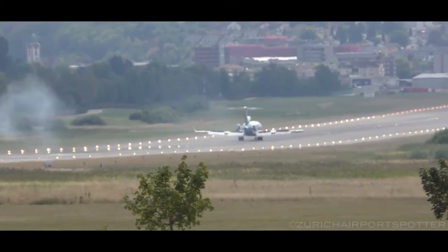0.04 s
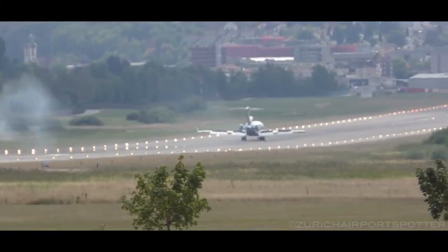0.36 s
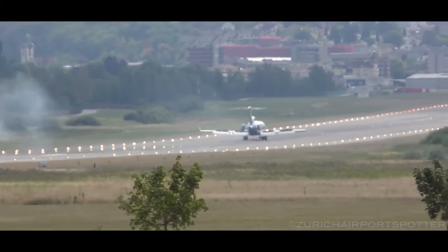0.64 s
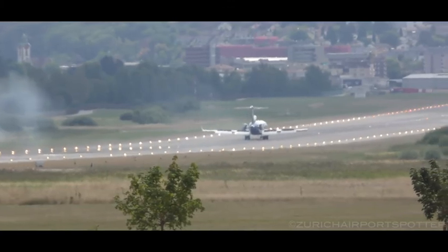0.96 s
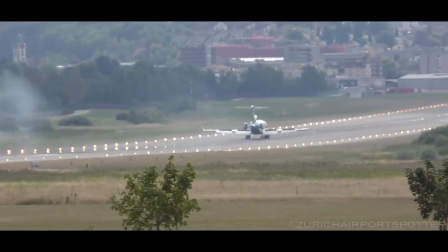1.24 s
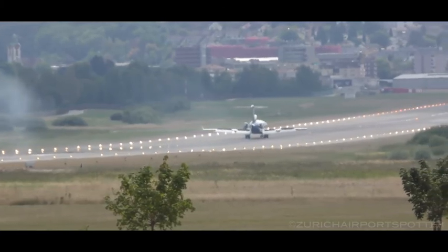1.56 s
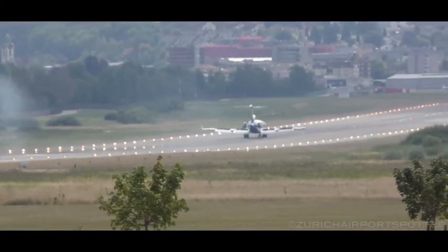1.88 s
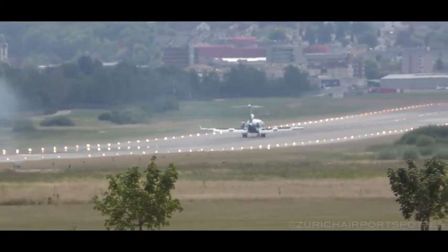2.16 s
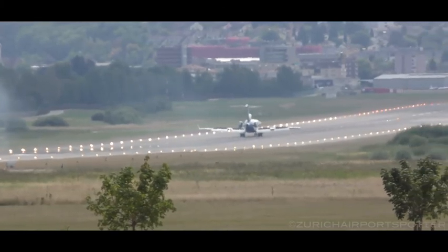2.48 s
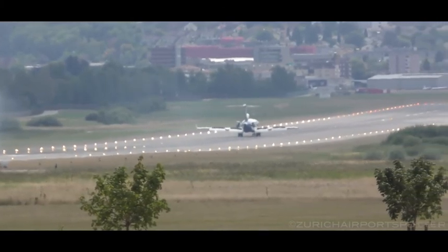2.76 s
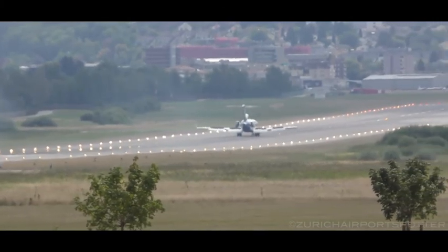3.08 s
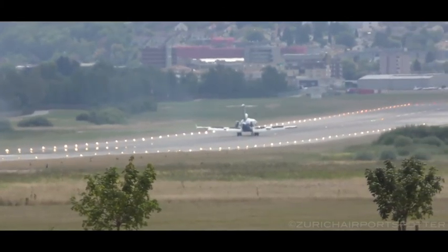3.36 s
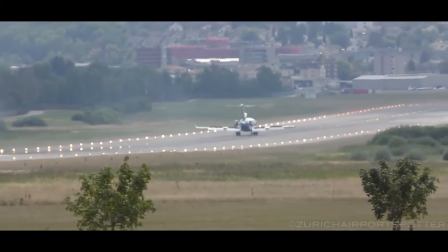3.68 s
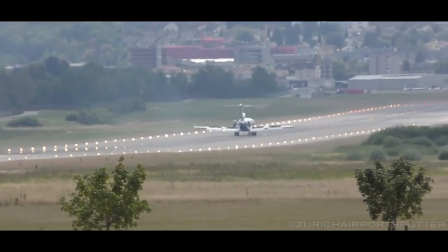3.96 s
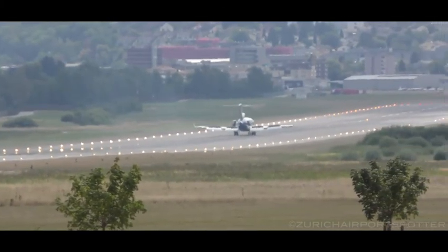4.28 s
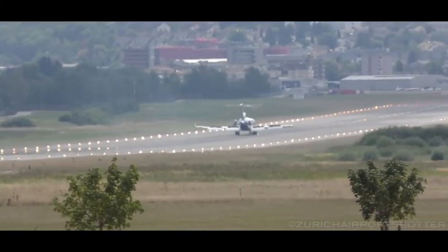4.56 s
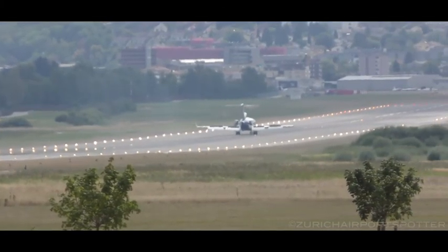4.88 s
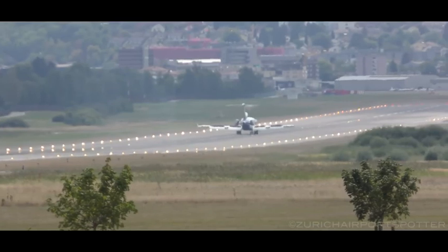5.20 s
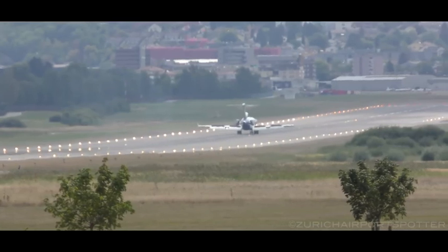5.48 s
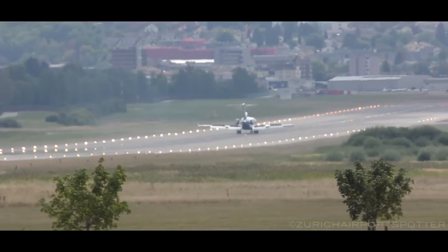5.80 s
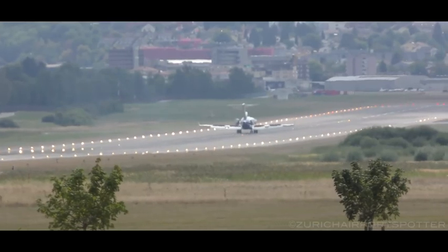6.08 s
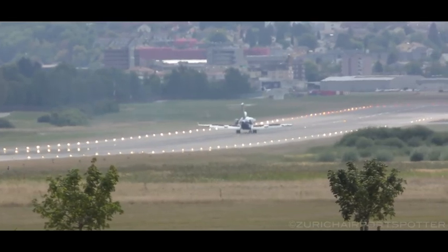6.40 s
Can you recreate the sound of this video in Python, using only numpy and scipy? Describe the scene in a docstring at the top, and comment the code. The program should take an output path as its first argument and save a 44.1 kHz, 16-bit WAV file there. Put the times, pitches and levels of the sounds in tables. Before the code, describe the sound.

Wind buffets the microphone in low, thumping gusts over the steady roar and rush of a distant jet on a runway.

```python
"""Gusts of wind buffet the microphone, and eddies shed by its housing hum with the wind's speed.
Beyond them a jet rolls along a far runway: the roar of its turbulent exhaust and a faint turbine
whistle swell across a meadow and waver in the moving air. Grasshoppers tick and rustle by
stridulation in the hissing grass, three faint clicks sound nearby, and a far bird peeps twice."""
import sys
import numpy as np
from scipy import signal
from scipy.fft import rfft, irfft, next_fast_len
from scipy.io import wavfile
from scipy.ndimage import uniform_filter1d, map_coordinates

SR = 44100
rng = np.random.default_rng(int(sys.argv[2]) if len(sys.argv) > 2 else 0)


def output_pcm(signal):
    """Save a mono or channel-first signal as 16-bit PCM at the path in sys.argv[1].

    Samples are clipped to [-1, 1] before scaling.
    """
    pcm = np.clip(np.atleast_2d(signal).T, -1, 1) * 32767
    wavfile.write(sys.argv[1], SR, np.round(pcm).astype(np.int16))


N = 288414


def amp(db):
    """Amplitude grows tenfold every 20 dB."""
    return 10 ** (np.asarray(db) / 20)


def unit(x):
    """Normalisation to rms 1."""
    return x / np.sqrt(np.mean(x ** 2) + 1e-20)


def curves(rows):
    """Linear interpolation in time: one curve for each column after the first."""
    times, *columns = np.transpose(rows)
    return [np.interp(np.arange(N) / SR, times, column) for column in columns]


def wobble(rate):
    """Smooth random modulation: a spline through rate knots a second."""
    knots = rng.standard_normal(int(N * rate / SR) + 4)
    return map_coordinates(knots, [np.arange(N) * rate / SR])


def swell(s, sigma):
    """A Gaussian envelope centred on s seconds."""
    away = (np.arange(N) / SR - s) / sigma
    return np.exp(-np.minimum(away ** 2 / 2, 20))


def filtered(x, response):
    """Linear filtering: the spectrum is multiplied by a frequency response."""
    size = next_fast_len(N + SR // 2)
    return irfft(rfft(x, size) * response(np.fft.rfftfreq(size, 1 / SR)), size)[:N]


def coloured(x, spectrum):
    """Spectral shaping by (Hz, dB) points on a log frequency axis, at rms 1."""
    f, db = np.transpose(spectrum)
    return unit(filtered(x, lambda hz: amp(np.interp(np.log(hz + 1), np.log(f + 1), db))))


def noise(spectrum):
    """Stationary coloured noise of rms 1."""
    return coloured(rng.standard_normal(N), spectrum)


def far_noise(spectrum, patchy_db):
    """Scintillation: turbulent air makes patches of a noise's spectrum fade and swell."""
    cells = signal.stft(rng.standard_normal(N), nperseg=1024)[2]
    fading = uniform_filter1d(rng.standard_normal(cells.shape), size=7, axis=0)  # across frequency
    fading = uniform_filter1d(fading, size=11, axis=1)  # across time
    patchy = signal.istft(cells * amp(patchy_db * unit(fading)))[1][:N]
    return coloured(patchy, spectrum)


def steadied(x, span):
    """Division by the running rms evens out swells slower than span seconds."""
    power = uniform_filter1d(x ** 2, size=int(span * SR))
    return unit(x / np.sqrt(np.abs(power) + 1e-6))


def narrow_tone(hz, rough, flutter_rate):
    """Random amplitude and phase modulation of a tone, at rms 1; rough is the noisy share."""
    share = np.clip(rough, 0, 1)
    flutter = np.sqrt(share / 2) * (wobble(flutter_rate) + 1j * wobble(flutter_rate))
    carrier = np.exp(2j * np.pi * np.cumsum(hz * np.ones(N)) / SR)
    return unit(np.real((np.sqrt(1 - share) + flutter) * carrier))


# Hiss of the grass. Each row: time in seconds, level in dB.
GRASS_LEVEL = [(0, -56), (.6, -56.5), (1.05, -55.5), (1.8, -58.5), (3.1, -60), (4.2, -57), (4.7, -59.5),
               (5.0, -56.5), (5.45, -59.5), (6.3, -56.5), (6.54, -56.5)]
# Its spectrum. Each row: frequency in Hz, relative density in dB.
GRASS_SPECTRUM = [(500, 2.5), (2000, 8), (2900, 1.5), (3350, -1), (3750, 0.5), (4100, -4), (5000, -10),
                  (6800, -18), (9500, -26), (15500, -27)]
def meadow():
    """Flow noise: grass and leaves hiss unevenly in the breeze, over the microphone's self-noise."""
    hiss_db, = curves(GRASS_LEVEL)
    hiss = amp(hiss_db + 0.29 * wobble(9)) * far_noise(GRASS_SPECTRUM, patchy_db=2.0)
    return hiss + amp(-73.0) * rng.standard_normal(N)


# Faint clicks nearby. Each row: start in seconds, level before the low-pass in dB.
CLICK_EVENTS = [(1.271, -44.5), (3.844, -51.5), (4.47, -46.3)]
# Their spectrum before the low-pass. Each row: frequency in Hz, relative density in dB.
CLICK_SPECTRUM = [(700, -5), (1400, -4.5), (3400, 0), (5000, -14), (14000, -23)]
def clicks(decay_s, cutoff_hz):
    """Damped transients: noise bursts decay exponentially, dulled by a low-pass."""
    t = np.arange(N) / SR
    envelope = sum(amp(db) * (t >= s) * np.exp(-np.abs(t - s) / decay_s) for s, db in CLICK_EVENTS)
    return filtered(noise(CLICK_SPECTRUM) * envelope, lambda hz: 1 / (1 + (hz / cutoff_hz) ** 4))


# Parts of the peeps. Each row: centre in seconds, pitch in Hz, level in dB,
# Gaussian width in seconds, noisy share from 0 to 1, flutter rate in Hz.
BIRD_PEEPS = [(4.343, 2260, -66, 0.04, 0.8, 150), (4.352, 3350, -62, 0.043, 0.95, 230.7),
              (4.385, 3445, -63.5, 0.024, 0.7, 110), (4.466, 3300, -66.5, 0.025, 0.9, 240),
              (6.494, 3010, -57, 0.01, 0.02, 100)]
def bird():
    """Spectral broadening: short peeps arrive blurred by distance."""
    return sum(amp(db) * swell(s, sigma) * narrow_tone(hz, rough, flutter_rate)
               for s, hz, db, sigma, rough, flutter_rate in BIRD_PEEPS)


# Thin insect rasps. Each row: start in seconds, end in seconds, level in dB.
RASP_RUNS = [(1.272, 1.417, -73.5), (1.699, 1.848, -77.5), (2.152, 2.97, -72.5)]
# Their spectrum. Each row: frequency in Hz, relative density in dB.
RASP_SPECTRUM = [(6000, -26.5), (10000, -8.5), (12500, -0.5), (15500, -1)]
def insect_rasps(edge_s=.03, flutter_db=4.0):
    """Amplitude-modulated noise: insects rasp high up in short fluttering runs."""
    t = np.arange(N) / SR
    runs = sum(amp(db) * np.clip(np.minimum(t - start, end - t) / edge_s + .5, 0, 1)
               for start, end, db in RASP_RUNS)
    return runs * amp(flutter_db * wobble(40)) * noise(RASP_SPECTRUM)


# The grasshopper chorus. Each row: time in seconds, level in dB.
CHORUS_LEVEL = [(0, -72.5), (.3, -66.5), (.5, -72), (1.15, -74), (1.35, -70.5), (1.62, -78), (1.82, -67.5),
                (2.05, -71.5), (2.3, -66), (2.9, -66.5), (3.08, -62.5), (3.4, -70.5), (3.82, -66.5),
                (4.05, -79.5), (4.7, -77), (5.0, -75.5), (5.5, -75), (6.0, -72.5), (6.54, -72.5)]
# Its spectrum. Each row: frequency in Hz, relative density in dB.
CHORUS_SPECTRUM = [(2500, -35), (4800, -0.5), (6700, 6), (8300, 2), (10000, -4.5), (12500, -3.5),
                   (15500, -4)]
def grasshopper_chorus(stroke_hz=18, depth_db=1.0):
    """Incoherent sources merge into one rustle that swells and ebbs in soft, uneven pulses."""
    level_db, = curves(CHORUS_LEVEL)
    cycles = np.cumsum(stroke_hz * (1 + 0.11 * wobble(4.1))) / SR
    pulse_db = depth_db * np.sin(2 * np.pi * cycles) + 1.8 * wobble(50)
    return amp(level_db + pulse_db) * noise(CHORUS_SPECTRUM)


# One grasshopper's phrases. Each row: start in seconds, end in seconds, strokes per second,
# final level in dB, relative level of the catch in dB, timing scatter in seconds.
TICK_PHRASES = [(0.022, 0.448, 17.1, -67.5, 0.5, .0008), (0.832, 1.86, 17.6, -73, -6.5, .007),
                (2.186, 3.19, 17.2, -68.5, -4.5, .003), (3.227, 3.468, 17.8, -65.5, -1.5, .0008),
                (3.505, 3.93, 17.15, -63, -2, 0.00073)]
# Spectrum of a stroke. Each row: frequency in Hz, relative density in dB.
TICK_SPECTRUM = [(3000, -55), (5600, -18.5), (6600, -4.5), (7700, -3), (8700, -10.5), (10500, -19.5),
                 (15500, -28)]
def grasshopper(catch_s=0.0035, scrape_db=-1.5, scrape_s=0.039, crescendo_db_per_s=2):
    """Stridulation: each wing stroke is a brief catch and a fading scrape; each phrase swells."""
    t = np.arange(N) / SR
    strokes = np.zeros(N)
    for start, end, rate, db, catch_db, scatter in TICK_PHRASES:
        for s in np.arange(start, end, 1 / rate):
            near = slice(max(int((s - .02) * SR), 0), int((s + .07) * SR))
            age = t[near] - s - scatter * rng.standard_normal()
            catch = amp(catch_db) * np.exp(-(age / catch_s) ** 2)
            attack = np.clip(age / catch_s + .5, 0, 1)
            scrape = amp(scrape_db) * attack * np.exp(-np.abs(age) / scrape_s)
            stroke_db = db - crescendo_db_per_s * (end - s) + rng.normal(0, .9)
            strokes[near] += amp(stroke_db) * (catch + scrape)
    return strokes * noise(TICK_SPECTRUM)


# The whistle as the air carries it over. Each row: time in seconds, level in dB.
WHISTLE_LEVEL = [(0, -72), (.95, -67.5), (1.7, -72.5), (3.5, -73), (4.1, -69.5), (4.6, -70.5), (4.95, -67),
                 (5.3, -69), (5.8, -68.5), (6.35, -67), (6.54, -68.5)]
def turbine(centre_hz=3380, width_hz=400):
    """Scattering in the exhaust and the long air path smears the blade tone into a narrow hiss."""
    level_db, = curves(WHISTLE_LEVEL)
    white = rng.standard_normal(N)
    band = filtered(white, lambda hz: 1 / (1 + ((hz - centre_hz) / width_hz * 2) ** 4) ** .5)
    return amp(level_db + .6 * wobble(8)) * unit(band)


# Exhaust levels before their gains. Each row: time in seconds, roar in dB, rush in dB.
EXHAUST_LEVELS = [(0.1, -40, -49.5), (0.49, -48.5, -50), (0.88, -42.5, -42.5), (1.3, -41, -42.5),
                  (2.1, -39, -43), (2.62, -37.3, -43), (2.85, -36.5, -41.5), (2.94, -40.5, -43),
                  (3.2, -38.5, -43), (3.75, -38, -43.5), (4.05, -36, -43.7), (4.25, -36, -43.5),
                  (4.42, -40.5, -44), (4.68, -39, -42.5), (4.81, -35, -42), (4.95, -36, -42.5),
                  (5.16, -37.5, -41.5), (5.39, -34.5, -42), (5.66, -37.5, -42.3), (6.0, -36.5, -42),
                  (6.46, -36.5, -44)]
# Spectra of the deep roar and the rush. Each row: frequency in Hz, relative density in dB.
ROAR_SPECTRUM = [(30, -19.5), (90, -1), (180, 4), (280, 0.5), (420, -4.5), (600, -12), (1000, -19.5),
                 (2500, -72)]
RUSH_SPECTRUM = [(150, -26.5), (400, 1.5), (620, 0), (1030, -4.5), (1400, -8), (1870, -16), (2400, -26),
                 (3000, -30), (4200, -35), (6000, -45.5), (12000, -64)]
def jet(roar_gain_db=3.5, rush_gain_db=1.5):
    """Turbulent mixing: large exhaust eddies roar, fine ones rush; distance absorbs the treble."""
    roar_db, rush_db = curves(EXHAUST_LEVELS)
    roar = steadied(far_noise(ROAR_SPECTRUM, patchy_db=0.96), span=0.12)
    rush = steadied(far_noise(RUSH_SPECTRUM, patchy_db=1), span=.2)
    return amp(roar_db + roar_gain_db) * roar + amp(rush_db + rush_gain_db) * rush


# Wind at the microphone. Each row: time in seconds, speed in metres per second.
WIND_SPEED = [(0, 3.6), (.16, 3.4), (.38, 2.6), (.6, 2.73), (.81, 3.22), (1.02, 2.87), (1.3, 2.53),
              (1.55, 3.0), (1.75, 2.1), (2.0, 3.7), (2.17, 4.2), (2.25, 3.8), (2.42, 4.65), (2.56, 3.9),
              (2.67, 4.15), (2.8, 3.1), (2.98, 2.65), (3.2, 3.06), (3.45, 3.1), (3.68, 2.8), (4.0, 3.18),
              (4.4, 2.58), (4.8, 2.67), (5.25, 2.15), (5.75, 1.8), (6.3, 2.61), (6.54, 3.6)]
# Thumping gusts. Each row: centre in seconds, peak in dB, Gaussian width in seconds,
# flapping relative to the thump in dB.
GUST_THUMPS = [(0.195, -20.5, 0.024, -19), (0.621, -15, 0.016, -30), (0.8, -32, 0.061, -4),
               (1.356, -14, 0.07, -16), (1.56, -9.5, 0.099, -22), (1.9, -12, 0.064, -20.5),
               (2.078, -10, 0.035, -30), (2.494, -13, 0.069, -17.5), (2.788, -13.5, 0.058, -13),
               (2.917, -12, 0.079, -30), (3.444, -11.5, 0.05, -25), (3.662, -17, 0.062, -9),
               (3.957, -10.5, 0.021, -25), (4.087, -16.5, 0.063, -17), (4.312, -12, 0.022, -24.5),
               (4.49, -15, 0.069, -20.5), (4.644, -10.5, 0.022, -22.5), (4.757, -13.5, 0.029, -22),
               (5.187, -15.5, 0.02, -28), (6.36, -16.5, 0.039, -24), (6.534, -11, 0.045, -8.5)]
# Spectra of the buffeting and the flapping. Each row: frequency in Hz, relative density in dB.
BUFFET_SPECTRUM = [(4, -23.5), (14, -1), (28, 3), (50, -2.5), (80, -6), (115, -14), (160, -26),
                   (250, -36.5), (500, -48.5), (2000, -119)]
FLAP_SPECTRUM = [(60, -8), (125, 6.5), (170, 1.5), (230, -12), (330, -21.5), (900, -62), (2500, -120)]
REFERENCE_M_PER_S = 3  # the wind's levels and pitch are given at this speed
BUFFET_DB, BUFFET_DB_PER_DOUBLING = -19.5, 5
HUM_HZ, HUM_DB, HUM_DB_PER_DOUBLING = 120.2, -29.5, 9
def wind(flutter_db=2.5, flutter_hz=12):
    """Turbulent pressure buffets the diaphragm; vortex shedding at the housing hums at a pitch
    proportional to speed. Each gust breaks the hum up into a thump and a brighter flapping."""
    speed = np.abs(curves(WIND_SPEED)[0]) / REFERENCE_M_PER_S
    doublings = np.log2(speed)
    flow = amp(BUFFET_DB + BUFFET_DB_PER_DOUBLING * doublings + flutter_db * wobble(flutter_hz))
    gust_power = sum((amp(db) * swell(s, sigma)) ** 2 for s, db, sigma, _ in GUST_THUMPS)
    push = np.sqrt(flow ** 2 + gust_power)
    buffet = push * steadied(noise(BUFFET_SPECTRUM), span=0.073)
    flaps = sum(amp(db + flap_db) * swell(s, sigma) for s, db, sigma, flap_db in GUST_THUMPS)
    flapping = flaps * noise(FLAP_SPECTRUM)
    calm = np.sqrt(flow / push)  # dips below 1 in a gust
    eddies = steadied(narrow_tone(HUM_HZ * speed, rough=.45, flutter_rate=44), span=.09)
    hum = calm * amp(HUM_DB + HUM_DB_PER_DOUBLING * doublings) * eddies
    return buffet + flapping + hum


def scene():
    """Superposition: the pressures of all sources add at one microphone."""
    pressure = jet() + turbine() + wind()
    pressure += grasshopper() + grasshopper_chorus() + insect_rasps()
    pressure += bird() + clicks(decay_s=0.0024, cutoff_hz=4400) + meadow()
    return pressure[None]


BAND_LIMIT_HZ = 15760
def record(dry):
    """An ideal low-pass: nothing above the band limit remains."""
    return filtered(dry[0], lambda hz: hz < BAND_LIMIT_HZ)[None]


dry = scene()
out = record(dry)
output_pcm(out)
```